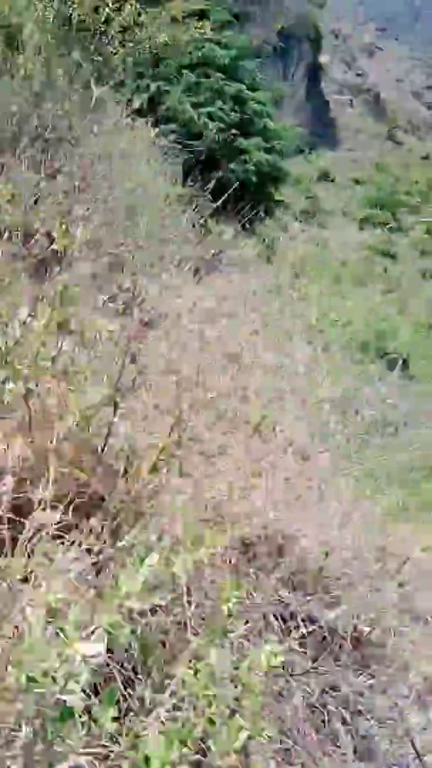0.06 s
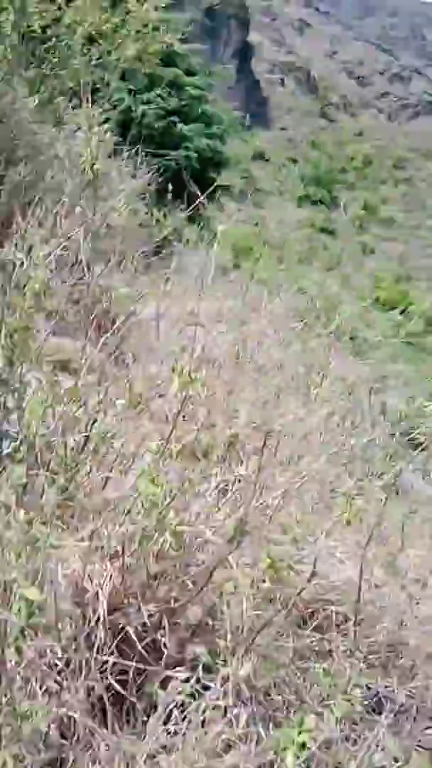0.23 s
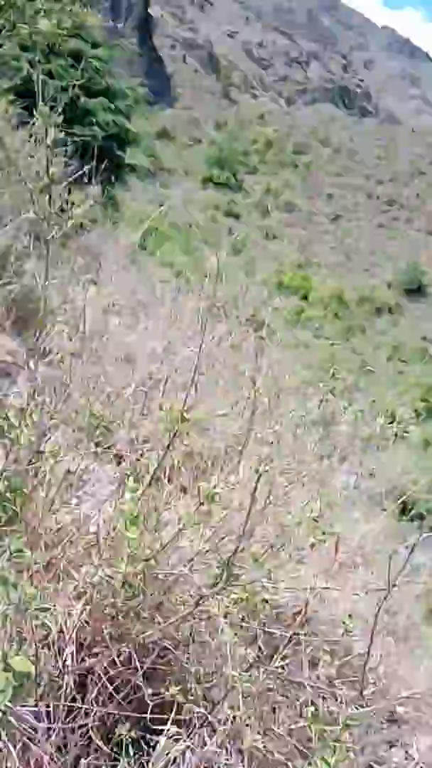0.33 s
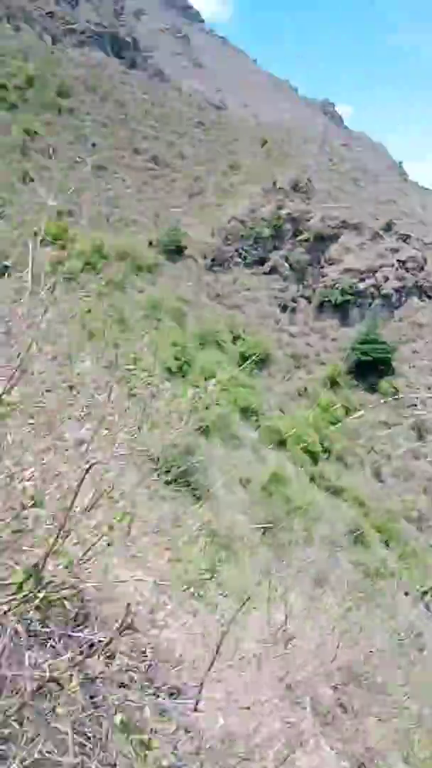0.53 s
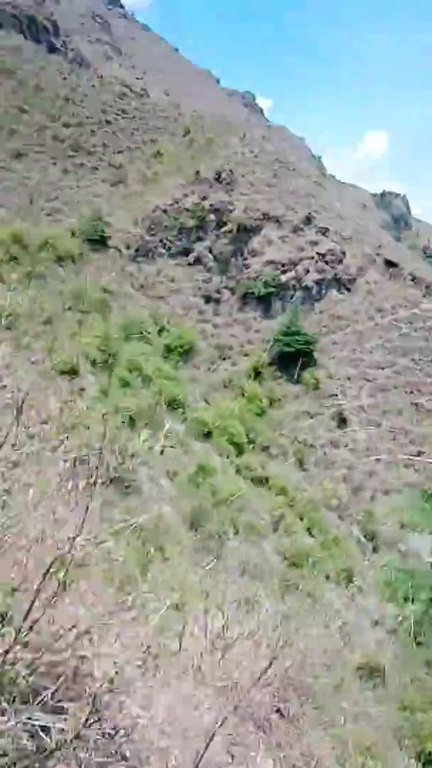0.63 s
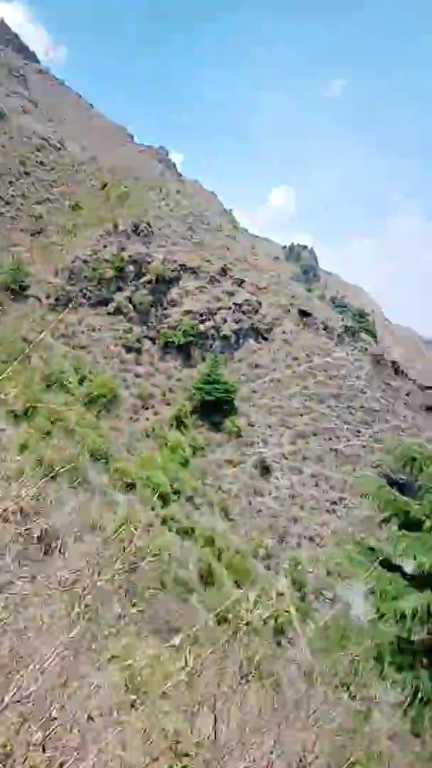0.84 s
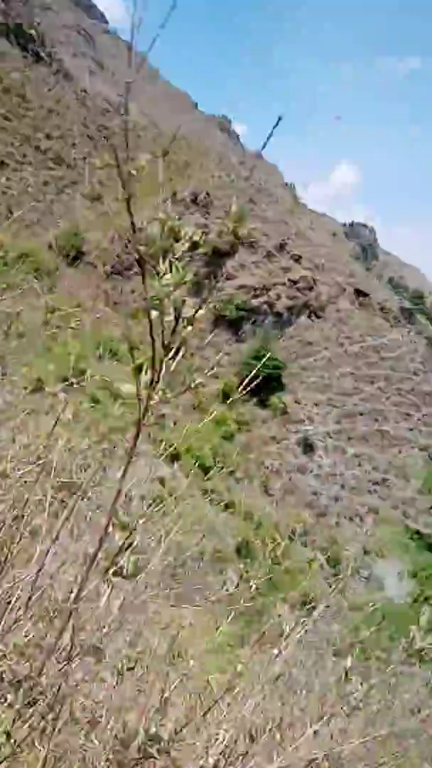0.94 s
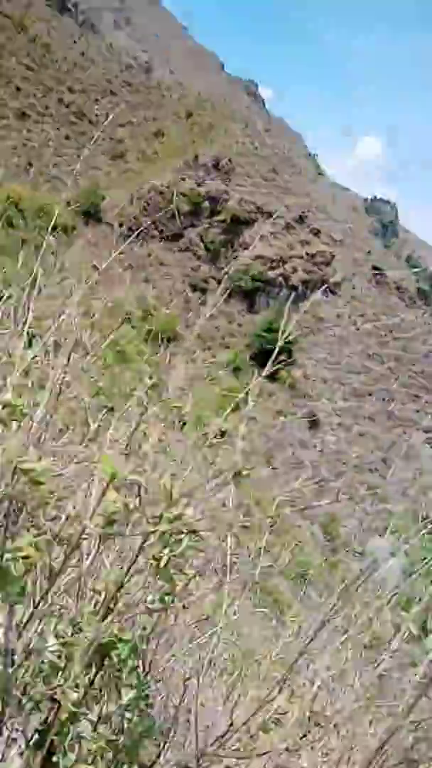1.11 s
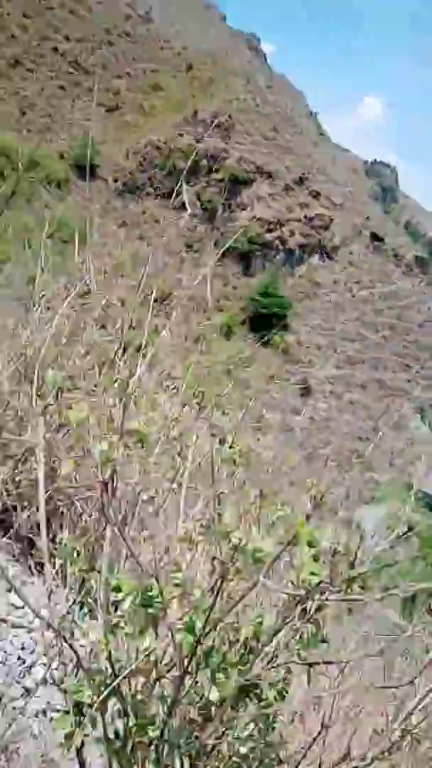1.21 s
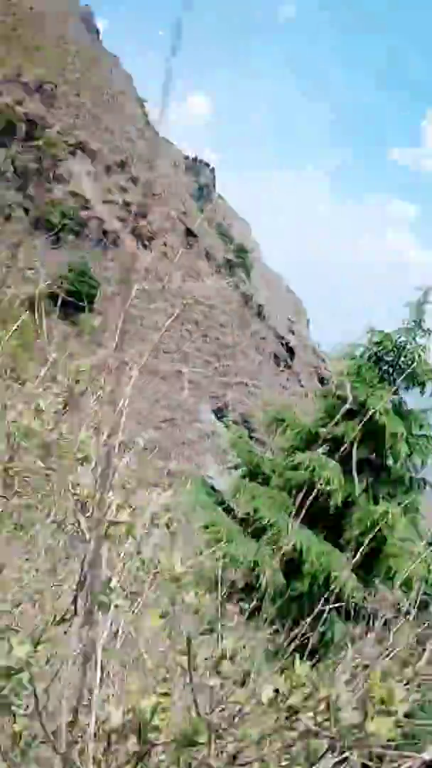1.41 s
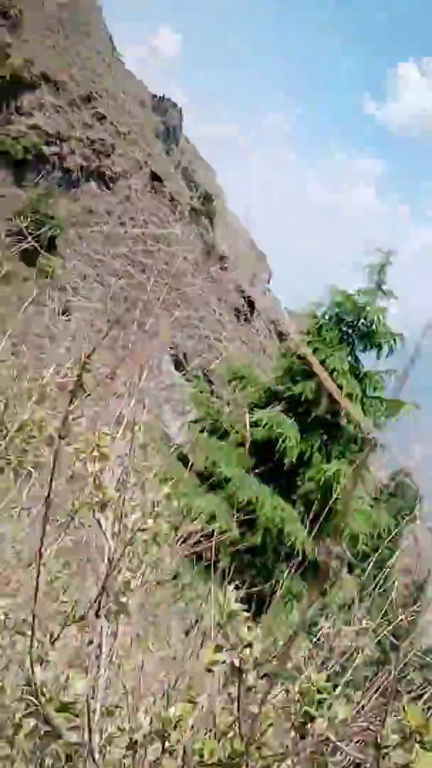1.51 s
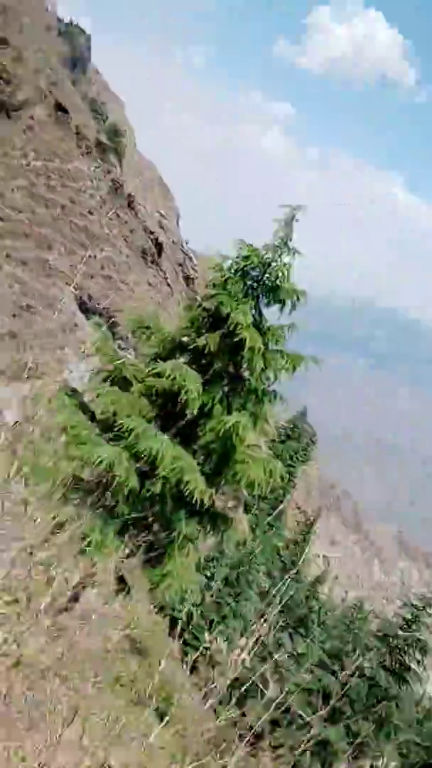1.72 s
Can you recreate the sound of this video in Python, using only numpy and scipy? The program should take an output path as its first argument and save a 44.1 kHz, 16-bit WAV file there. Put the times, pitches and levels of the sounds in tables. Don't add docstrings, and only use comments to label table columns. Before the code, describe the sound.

Dry brush crackles and rustles underfoot as someone walks a hillside, with sharp brittle twig snaps

```python
import sys
import numpy as np
from scipy import signal
from scipy.io import wavfile
from scipy.ndimage import uniform_filter1d

SR = 44100
rng = np.random.default_rng(int(sys.argv[2]) if len(sys.argv) > 2 else 0)


def unload_wav(signal):
    wavfile.write(
        sys.argv[1],
        SR,
        np.round(np.clip(np.atleast_2d(signal).T, -1, 1) * 32767).astype(np.int16),
    )


def undo_db(level):
    steps = np.asarray(level, float) / 20
    return 10 ** steps


N = 77175

# start in seconds, length in seconds, level in dB,
# ground relative to level in dB, body weight relative to level in dB.
CRUSH_EVENTS = [(.02, 0.038, -71, 10.5, 12.5), (.095, 0.025, -56.5, 1, 5), (.19, 0.037, -50.5, -10, -3),
                (.208, 0.03, -44.5, -6.5, -7), (.24, 0.028, -53, -4.5, -10), (.45, 0.15, -55.5, -1.5, -37),
                (.548, 0.03, -44, -11, -2), (.578, 0.047, -49.5, 2, -7), (.634, 0.018, -47.5, -5.5, -7.5),
                (.666, 0.021, -45.5, -6, -6.5), (.692, 0.01, -55, 4.5, -9), (.8495, 0.025, -49, -19, -6.5),
                (.88, 0.024, -51, 0.5, -21), (1.04, 0.058, -52.5, -10, -14), (1.228, 0.0036, -35.5, -2, -3),
                (1.25, 0.027, -61.5, -11.5, 3.5), (1.325, 0.084, -54.5, -25, -12.5),
                (1.394, 0.028, -56, -26, -6.5), (1.685, 0.034, -69.5, -23, -7.5), (1.742, .008, -75, -5, 8)]
# start in seconds, length in seconds, level in dB,
# upper treble relative to level in dB.
RASP_EVENTS = [(.005, 0.059, -64, 6.5), (.102, 0.015, -59, 6.5), (.196, 0.0047, -49, -1),
               (.209, 0.021, -50.5, -0.5), (.3367, 0.003, -52.5, 9), (.3448, 0.0045, -52, 7),
               (.355, 0.017, -61, 5.5), (.503, 0.017, -59, 5.5), (.522, 0.048, -65.5, 6),
               (.72, 0.24, -66, -21), (.838, 0.037, -67, 9), (.93, 0.065, -56, -8.5),
               (1.027, 0.083, -58.5, -1.5), (1.15, 0.002, -50, 5), (1.165, .008, -69, 11),
               (1.1985, 0.0035, -45.5, -5), (1.208, 0.025, -61, 8), (1.255, 0.016, -51, -3),
               (1.271, .016, -60, 1), (1.335, 0.038, -51.5, -30), (1.394, 0.034, -54, -9),
               (1.068, 0.008, -59.5, 1), (1.4635, 0.0077, -52, 2), (1.477, 0.0083, -53, 1.5),
               (1.491, 0.0093, -56, 2), (1.612, 0.023, -64.5, -4)]
# time in seconds, peak in dB, ring in Hz, thud relative to peak in dB.
TWIG_SNAPS = [(0.0163, -33.5, 6000, -35), (0.0301, -28, 11400, -38), (0.0736, -30.5, 2790, -22),
              (0.1041, -36, 12400, -5), (0.1566, -27.5, 3280, -34), (0.2761, -31.5, 11700, -34),
              (0.34, -24, 2660, -22), (.3449, -17.5, 2285, -28.5), (.3965, -47, 2330, -34),
              (.4135, -39, 2330, -20), (0.4483, -38.5, 2200, -7), (0.7098, -27.5, 2280, -20.5),
              (0.8504, -28.5, 2570, -9), (.8965, -25.5, 1560, -12.5), (1.027, -36, 6000, -25),
              (1.035, -36, 1860, -4), (1.049, -33, 3800, -16), (1.0589, -24, 1760, -5),
              (1.0804, -29, 3820, -7), (1.1078, -34, 3650, -31), (1.1225, -35.5, 1610, -10),
              (1.1455, -26.5, 6000, -41), (1.212, -31.5, 1630, -27), (1.2331, -16, 2050, -21),
              (1.3549, -25, 3970, -29), (1.3915, -24, 2230, -19.5), (1.4122, -28, 6260, -28),
              (1.4178, -23, 3930, -31), (1.7141, -42.5, 2270, -26), (1.741, -59, 12100, -32.5)]
# time in seconds, peak in dB, ring in Hz,
# thud relative to peak in dB.
STALK_CRACKS = [(.1908, -36, 3900, -30), (.2098, -25.5, 2350, -23), (.2138, -29, 2200, -8),
                (.2165, -24.5, 2900, -14.5), (.2238, -34.5, 1490, -12), (.2278, -33, 2170, 1),
                (.2312, -31, 2040, -12), (.2378, -40, 2060, -10), (.3369, -19, 10700, -31),
                (.3382, -30, 6240, -42), (.3454, -22.5, 4200, -35), (.3485, -43, 4000, -41),
                (.5028, -35.5, 4620, -30), (.5493, -23, 2230, -11), (.5518, -23, 2240, -24),
                (.5545, -30, 4300, -1.5), (.5572, -22.5, 2000, -14), (.5615, -28, 2160, -5),
                (.5645, -37, 2470, -18), (.569, -22, 2100, -26), (.5715, -33, 2100, -7),
                (.5895, -38, 4300, -4), (.6355, -41, 2500, -16), (.6674, -33, 2190, -14),
                (.8415, -36.5, 4200, -25), (.8573, -40, 2490, -10), (.8592, -32, 2280, -9.5),
                (.8652, -38, 2300, -3), (.871, -47, 2350, 4), (.8838, -42, 4100, -12),
                (.8875, -26.5, 2600, -33), (.8922, -46, 2300, 4), (.9236, -47, 2430, -7),
                (1.1438, -35, 12300, -38), (1.1495, -34.5, 2670, -35), (1.1497, -23, 14900, -43),
                (1.1682, -34, 15000, -40), (1.1987, -22.5, 14900, -40), (1.2283, -33, 1550, -28),
                (1.2312, -34, 2150, 1), (1.2322, -23.5, 3230, -32), (1.2333, -21, 5350, -33),
                (1.2355, -23.5, 2005, -32), (1.2565, -28, 14600, -42), (1.2572, -36, 2300, -31),
                (1.3241, -46, 2440, -32), (1.3391, -36, 2310, -28), (1.4638, -40, 2630, -25),
                (.6505, -37, 1950, -6), (.678, -37, 2220, -5)]
# time in seconds, level in dB, brightness in dB,
# ground in dB, fullness in dB.
RUSTLE = [(0, -64.5, 1, 9, -2.5), (.16, -63.5, 6, -3, 1), (.28, -61, -1, -6, -2), (.325, -71.5, 3, -1.5, 0),
          (.37, -71, 7, 1.5, 3), (.43, -62, -2, 0, -7.5), (.55, -55, -2, 8, -2.5),
          (.72, -61, 1.5, -3.5, -2), (.84, -60, 0.5, -2.5, 3.5), (.95, -60, 2.5, -7, -2),
          (1.02, -59, -1.5, -9.5, -1), (1.17, -59, -1.5, -6.5, 1), (1.3, -57, -3, -3, -3),
          (1.44, -59, -1, 2, -1), (1.53, -61.5, -2, -5, -3), (1.59, -68, 5, -13.5, -9),
          (1.67, -74.5, 3, -26, -11), (1.75, -64, 5.5, -14, -0.5)]
# time in seconds, level in dB.
WIND_LEVEL = [(0, -73), (.06, -70), (.14, -55), (.18, -95.5), (.22, -62.5), (.3, -64), (.35, -66.5),
              (.47, -57), (.58, -64.5), (.64, -88), (.7, -75), (.8, -91), (1.2, -107), (1.27, -75),
              (1.33, -93), (1.6, -100), (1.67, -71), (1.75, -78)]
# centre in Hz, width in Hz, level in dB.
STALK_MODES = [(1434, 454, -3.5), (2280, 610, 0), (4120, 900, -5.5), (6000, 580, -18)]
# centre in Hz, width in Hz, level in dB.
GROUND_MODES = [(390, 107, -7), (551, 159, -3.5), (732, 285, -4.5)]
# centre in Hz, width in Hz, level in dB.
WEIGHT_MODES = [(175, 80, -9), (253, 142, 2)]
# centre in Hz, width in Hz, level in dB.
LEAF_MODES = [(4200, 1060, 1.5), (5960, 1860, 6.5), (2440, 770, -3)]
# centre in Hz, width in Hz, level in dB.
CRISP_MODES = [(10280, 2940, 7), (12520, 2940, 0.5), (15000, 2200, 0.5)]


def band(x, hz, width):
    return signal.lfilter(*signal.iirpeak(hz, hz / width, fs=SR), x)


def two_bands(x, hz, width):
    return band(band(x, hz, width), hz, 2 * width)


def unit_rms(x):
    return x / np.sqrt(np.mean(x ** 2))


def unit_peak(x):
    return x / np.abs(x).max()


def walk(rate):
    hold = int(SR / rate)
    steps = np.repeat(rng.standard_normal(N // hold + 1), hold)
    return 0.81 * uniform_filter1d(steps, hold)[:N]


def curve(rows, column):
    rows = np.array(rows)
    return np.interp(np.arange(N) / SR, rows[:, 0], rows[:, column])


def bursts(rows, attack_s, release_s):
    t, power = np.arange(N) / SR, 0
    for start, length, db, *relative_db in rows:
        attack = np.clip((t - start) / attack_s, 0, 1)
        decay = np.exp(-np.clip(t - start - length, 0, None) / release_s)
        part_db = db + np.array([0, *relative_db])
        power = power + (attack * decay) ** 2 * undo_db(2 * part_db)[:, None]
    return power


def grains(smooth):
    chance = rng.random((3, N))
    breaks = chance[0] < 1300 / SR
    size_db = np.minimum(-4.5 * np.log(chance[1] + 1e-9), 13)
    size = undo_db(size_db) * np.sign(chance[2] - .5)
    return unit_rms(breaks * size) + smooth * rng.standard_normal(N)


def resonate(modes, drive, smooth):
    shared, out = grains(smooth), 0
    for (hz, width, db), push in zip(modes, np.broadcast_to(drive, (len(modes), N))):
        source = (shared + 0.86 * grains(smooth)) * undo_db(2.16 * walk(59.79))
        ringing, steady = source * push, source
        for _ in range(3):
            ringing = band(ringing, hz, 2.34 * width)
            steady = band(steady, hz, 2.34 * width)
        out = out + undo_db(db) * ringing / np.std(steady)
    return out / np.sqrt(sum(undo_db(2 * db) for _, _, db in modes))


def fullness(modes):
    others = (np.arange(len(modes)) != 1)[:, None]
    return undo_db(others * curve(RUSTLE, column=4))


def crushing():
    crush = bursts(CRUSH_EVENTS, attack_s=0.0019, release_s=0.0078) * undo_db(2 * 3 * walk(180))
    moving = curve(RUSTLE, column=1)
    deep = moving + curve(RUSTLE, column=3)
    heavy = deep + curve(RUSTLE, column=4) - 14.5
    stalks = fullness(STALK_MODES) * np.sqrt(crush[0] + undo_db(2 * moving))
    ground = fullness(GROUND_MODES) * np.sqrt(crush[1] + undo_db(2 * deep))
    weight = np.sqrt(crush[2] + undo_db(2 * heavy))
    return (resonate(STALK_MODES, stalks, smooth=0.29)
            + resonate(GROUND_MODES, ground, smooth=0.55)
            + resonate(WEIGHT_MODES, weight, smooth=0.34))


def rasping():
    rasp = bursts(RASP_EVENTS, attack_s=0.0005, release_s=0.004) * undo_db(2 * 3.5 * walk(150))
    moving = curve(RUSTLE, column=1)
    bright = moving + curve(RUSTLE, column=2)
    leaves = fullness(LEAF_MODES) * np.sqrt(rasp[0] + undo_db(2 * (moving - 0.5)))
    crisp = np.sqrt(rasp[1] + undo_db(2 * bright))
    return resonate(LEAF_MODES, leaves, smooth=0.75) + resonate(CRISP_MODES, crisp, smooth=0.33)


def wind():
    x = rng.standard_normal(N)
    for _ in range(3):
        x = band(x, 70, 1.58 * 55)
    x = x / np.sqrt(uniform_filter1d(x ** 2, size=1800))
    x = x * undo_db(curve(WIND_LEVEL, column=1) + 1.5 * walk(24.48))
    return signal.sosfilt(signal.butter(N=4, Wn=200, fs=SR, output="sos"), x)


def snapping(rows, sharpness, broad_db):
    size = 1024
    out = np.zeros(N + size)
    chance = rng.random((len(rows), 3))
    impulse = np.eye(1, size)[0]
    thud = unit_peak(two_bands(impulse, 495, 217))
    for (start, db, hz, thud_db), c in zip(rows, chance):
        kick = np.zeros(size)
        kick[[0, int(18 + 4 * c[0]), int(70 + 60 * c[1])]] = 1, .6, .3
        stalks = two_bands(kick, 1800, 580)
        stalks = stalks + 1.36 * two_bands(kick, 4310, 1400)
        stalks = stalks + 0.88 * two_bands(kick, 5600, 1560)
        stalks_db = broad_db - 19.0 * abs(np.log2(hz / 3000))
        twig = unit_peak(two_bands(kick, hz, hz / sharpness))
        ring = unit_peak(twig + undo_db(stalks_db) * unit_peak(stalks))
        i = int(start * SR)
        out[i:i + size] += undo_db(db - 5.5) * (ring - undo_db(thud_db) * thud)
    return out[:N]


def knock():
    lean_s, swing_s = .004, .0032
    t = np.arange(N) / SR - 1.2338
    lean = np.clip(1 + t / lean_s, 0, 1) ** 2 * np.clip(1 - 4 * t / swing_s, 0, 1)
    swing = np.sin(np.pi * np.clip(t / swing_s, 0, 1))
    after = np.clip(t - swing_s, 0, None)
    rebound = np.sin(2 * np.pi * 103 * after) * np.exp(-after / 0.0055)
    return undo_db(-22) * (undo_db(-0.5) * lean - swing + undo_db(-10) * rebound)


def scene():
    brush = crushing() + rasping()
    snaps = snapping(TWIG_SNAPS, sharpness=3.5, broad_db=5)
    cracks = snapping(STALK_CRACKS, sharpness=3.18, broad_db=0.5)
    hiss = undo_db(-89) * rng.standard_normal(N)
    return (brush + wind() + snaps + cracks + knock() + hiss)[None]


def low_pass(x):
    return signal.sosfilt(signal.butter(12, 16560, fs=SR, output="sos"), x)


def record(dry):
    x = dry - 0.78 * band(dry, 8340, 6030)
    x = signal.sosfilt(signal.butter(N=2, Wn=52, btype="high", fs=SR, output="sos"), x)
    x = signal.sosfilt(signal.ellip(8, .2, 60, 15750, fs=SR, output="sos"), x)
    return low_pass(x)


dry = scene()
out = record(dry)
unload_wav(out)
```